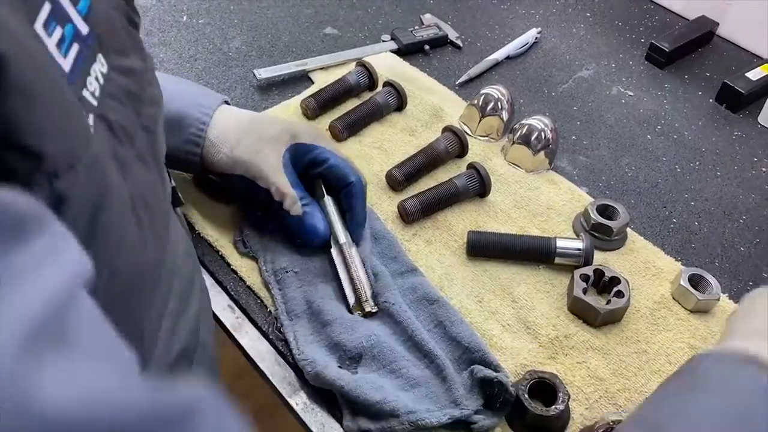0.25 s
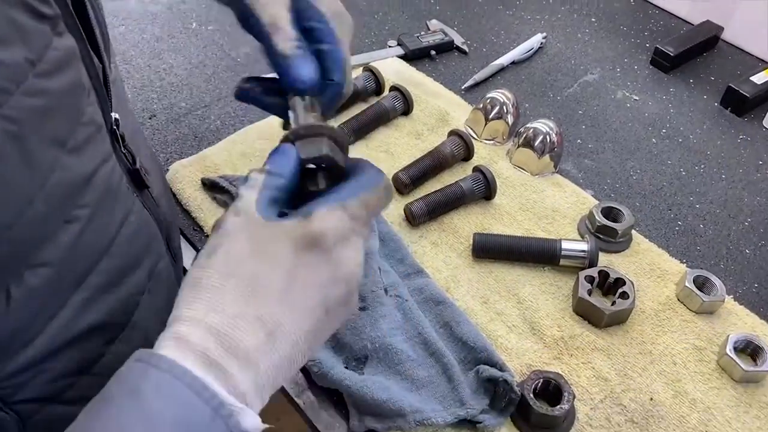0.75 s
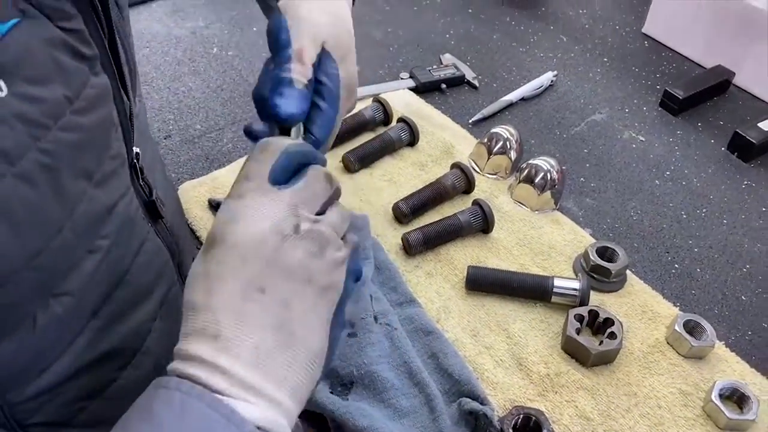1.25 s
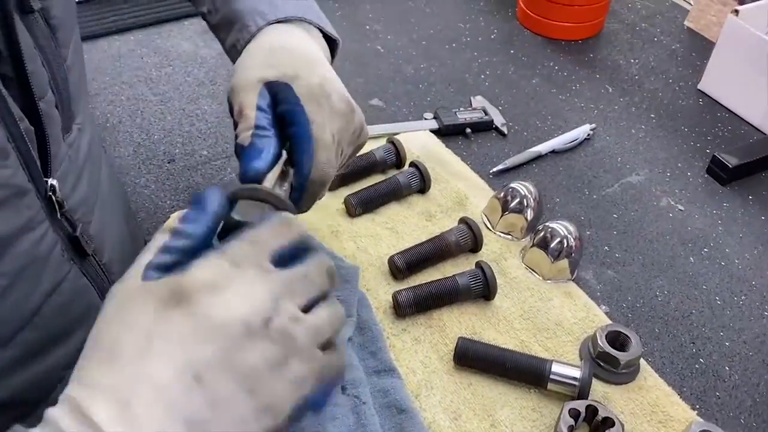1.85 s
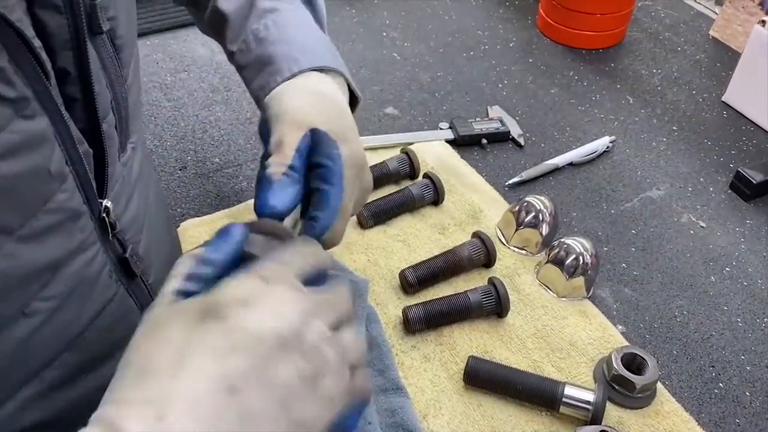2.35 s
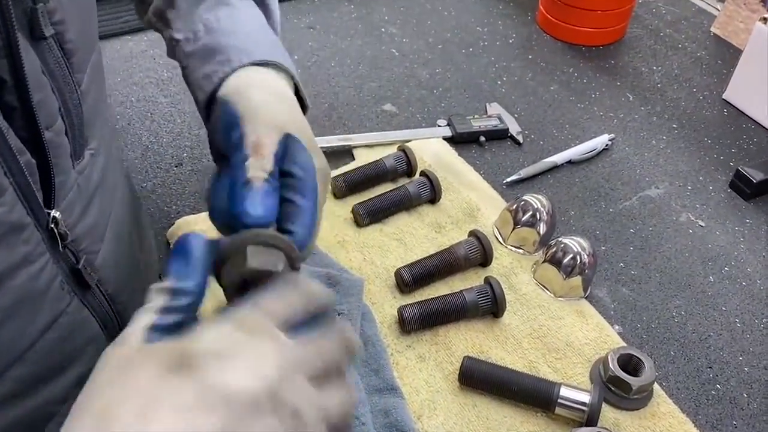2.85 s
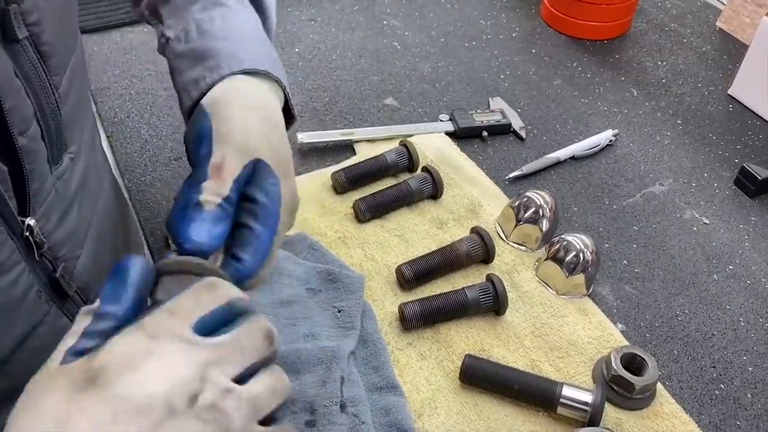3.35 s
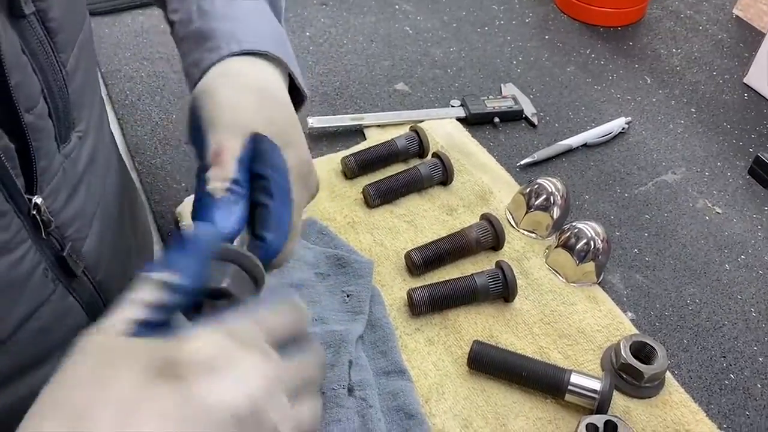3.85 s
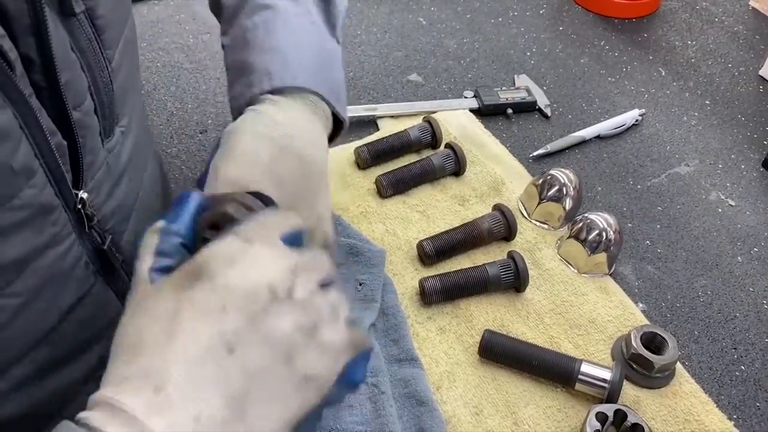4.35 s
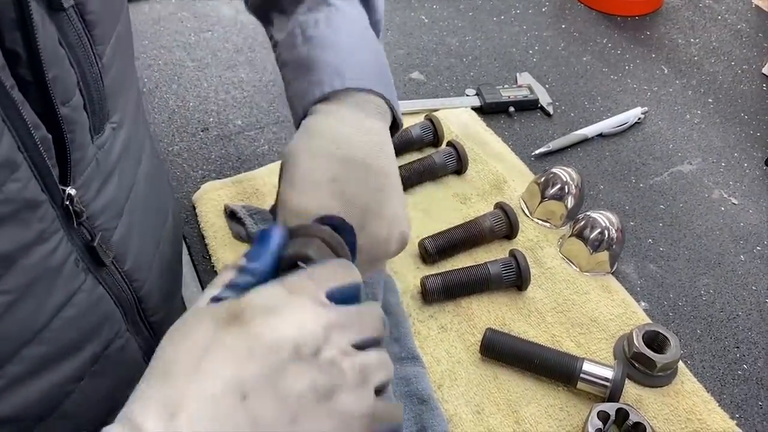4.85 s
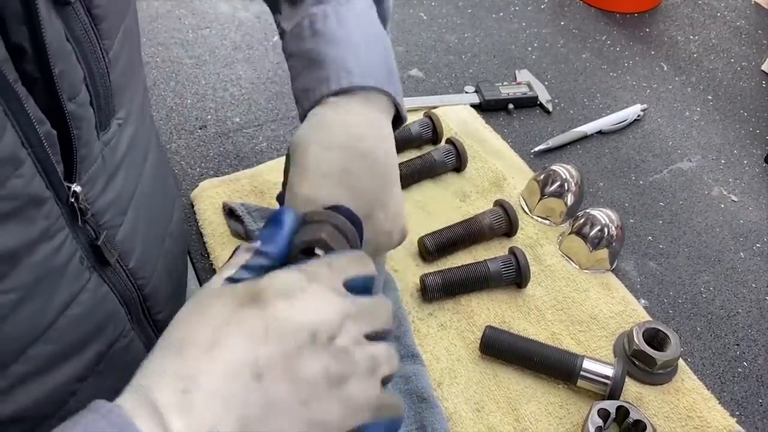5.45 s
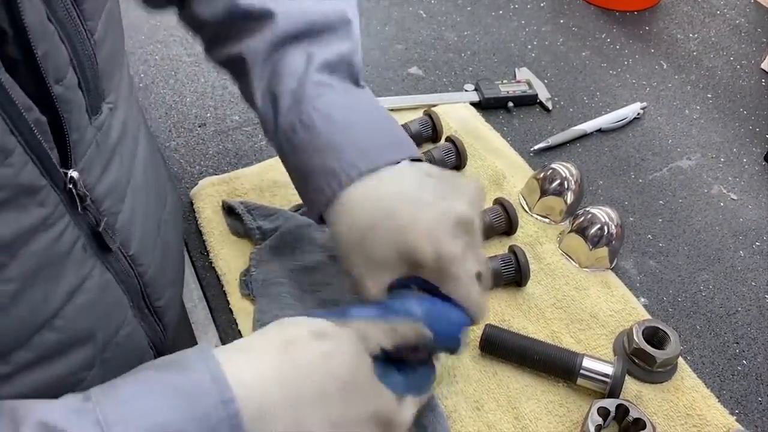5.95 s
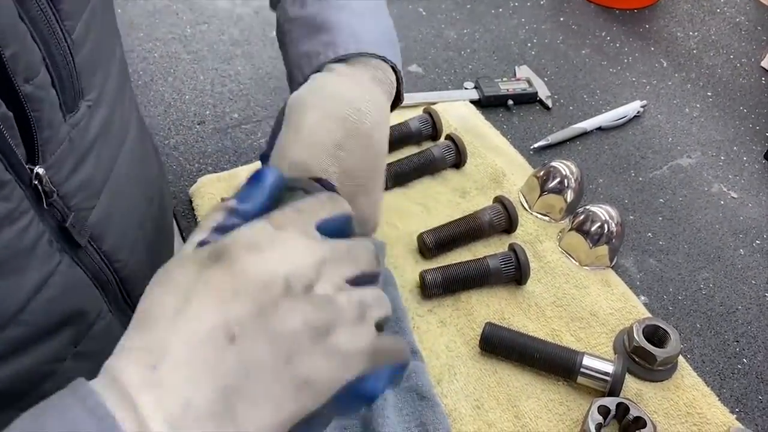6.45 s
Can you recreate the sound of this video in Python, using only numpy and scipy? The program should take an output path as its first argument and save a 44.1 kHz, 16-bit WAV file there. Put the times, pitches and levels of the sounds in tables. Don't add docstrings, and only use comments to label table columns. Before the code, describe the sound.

A close microphone in a shop with steady low ventilation rumble and soft hiss throughout. From 0 to 0.7 s there is only faint rubbery glove fizz, with a snap at 0.2 s. At 0.74 s a knuckle bumps the padded bench: a heavy, dull, quickly damped thud with small jolts after it. Soft glove slides follow. At 1.66 s a loud bright clink rings, repeated at 1.77 s as the nut meets the steel tap. Short twists then scrape and tick, with bright clacks near 2.7 s, gritty ticking from 3.1 to 3.6 s, strong clinks around 4.0 and 4.12 s, and another at 4.57 s. Faint high squeals appear. After about 5 s, metal sounds thin out and glove rubbing, snaps and regripping dominate, busiest from 5.7 to 6.6 s, with a brief chirp at 5.73 s. Short wall reflections trail the clinks.

```python
import sys
import numpy as np
from scipy import signal
from scipy.fft import rfft, irfft
from scipy.io import wavfile
from scipy.ndimage import uniform_filter1d, minimum_filter1d

SR = 44100
rng = np.random.default_rng(int(sys.argv[2]) if len(sys.argv) > 2 else 0)


def waveform_to_disk(signal):
    frames = np.transpose(np.atleast_2d(signal))
    scaled = np.clip(frames, -1, 1) * 32767
    samples = np.round(scaled).astype(np.int16)
    wavfile.write(sys.argv[1], SR, samples)


def boost_factor(decibels):
    exponent = np.asarray(decibels, float) / 20
    return 10 ** exponent


N = 295470


def evened(x):
    return x / np.sqrt(np.mean(x ** 2) + 1e-20)


def read(points, hz):
    f, value = np.transpose(points)
    return np.interp(np.log(hz + 1), np.log(f + 1), value)


def add(mix, s, sound):
    part = mix[round(s * SR):][:len(sound)]
    part += sound[:len(part)]


def coloured(x, spectrum):
    gain = boost_factor(read(spectrum, np.fft.rfftfreq(len(x), 1 / SR)))
    return irfft(rfft(x) * gain, len(x))


def bell(t, middle_s, half_s):
    return np.exp(-.5 * ((t - middle_s) / half_s) ** 2)


def resonate(x, hz, width):
    turn = np.exp(2j * np.pi * np.cumsum(hz * np.ones(len(x))) / SR)
    r = np.exp(-np.pi * width / SR)
    return 2 * (turn * signal.lfilter([1 - r], [1, -r], x / turn + 1e-18)).real


def resonate_twice(x, hz, width):
    return resonate(resonate(x, hz, width), hz, width)


def ringing(modes, t):
    return sum(boost_factor(db - 60 * t / t60) * np.sin(2 * np.pi * hz * t) for hz, db, t60 in modes)


def lumps(seconds, depth_db):
    size = max(round(seconds * SR), 1)
    wander = uniform_filter1d(uniform_filter1d(rng.standard_normal(N), size), size)
    return boost_factor(depth_db * evened(wander))


def slips(per_s, spread_db):
    size = boost_factor(spread_db * np.minimum(rng.exponential(1, N), 5)) * rng.choice([-1., 1.], N)
    return evened(size * (rng.random(N) < per_s / SR))


# pitch_hz, density_db (per Hz)
SHOP_AIR = [(15, -36), (25, -12), (50, -11.5), (72, 3), (96, 3.5), (156, -5.5), (233, -8), (297, -14),
            (421, -16), (703, -14), (970, -9.5), (1620, -19), (5140, -25), (15500, -30.5)]
# time_s, level_db
RUMBLE = [(0, -48.5), (.95, -47), (1.06, -49), (1.84, -47.5), (1.97, -50.5), (2.37, -49), (2.41, -46),
          (3.85, -45.5), (4.09, -52.5), (4.18, -46.5), (4.3, -48.5), (6.7, -48)]


def shop():
    air = boost_factor(-45.0) * evened(coloured(rng.standard_normal(N), SHOP_AIR))
    bass = signal.sosfiltfilt(signal.butter(2, 220, fs=SR, output="sos"), air)
    s, db = np.transpose(RUMBLE)
    swell = boost_factor(np.interp(np.arange(N) / SR, s, db))
    return air - bass + swell * evened(bass)


# time_s, level_db
FIDGET = [(0, -74), (.2, -58.5), (.45, -55), (.72, -52.5), (.76, -67), (1.0, -73), (1.1, -55.5), (1.6, -62),
          (1.9, -70), (2.1, -53), (2.65, -58), (2.85, -55), (3.6, -64), (3.8, -68), (4.3, -57),
          (5.0, -58.5), (5.5, -54.5), (6.7, -54.5)]


def pressure(moves, rest_db, lag_s=0.0021):
    t = np.arange(N) / SR
    level_db = np.interp(t, *np.transpose(FIDGET)) + rest_db
    for s, length, db, swell_db in moves:
        part = level_db[round(s * SR):round((s + length) * SR)]
        np.maximum(part, db + swell_db * np.linspace(-.5, .5, len(part)), out=part)
    keep = np.exp(-1 / (lag_s * SR))
    return signal.lfilter([1 - keep], [1, -keep], boost_factor(level_db))


# start_s, length_s, level_db, swell_db
SLIDES = [(0.408, 0.021, -49, -3), (0.736, 0.021, -47, -24), (0.836, 0.12, -54.5, -5),
          (1.028, 0.03, -53, -1), (1.222, 0.047, -48, -14), (2.108, 0.035, -50.5, 0),
          (2.284, 0.064, -48.5, 9), (2.346, 0.072, -44, -9), (2.692, 0.056, -48, 0),
          (2.942, 0.058, -43, -1), (3.879, 0.059, -48, 0), (4.116, 0.084, -46, -13),
          (4.368, 0.026, -47.5, -6), (4.4, 0.19, -54.5, -2), (4.56, 0.058, -45.5, -10),
          (4.795, 0.13, -50.5, 10), (5.076, 0.17, -50.5, -4), (5.364, 0.079, -50.5, 11),
          (5.456, 0.029, -44, -1), (5.654, 0.043, -49.5, 9), (5.722, 0.029, -39, 0),
          (5.754, 0.029, -39.5, 4), (5.843, 0.015, -45, -2), (5.868, 0.049, -50.5, -2),
          (5.961, 0.039, -50, -21), (6.015, 0.044, -42.5, 4), (6.064, 0.03, -43, -1),
          (6.097, 0.083, -49, 9), (6.284, 0.036, -42.5, -8), (6.359, 0.025, -40.5, 5),
          (6.387, 0.033, -43.5, -5), (6.423, 0.028, -43, -5), (6.514, 0.042, -43.5, 11),
          (6.614, 0.034, -52.5, -26), (5.801, 0.015, -50, -3), (6.46, 0.021, -54, -8), (6.18, .08, -56, -3)]
# start_s, length_s, grit_db, tap_ring_db, swell_db
TWISTS = [(1.669, 0.12, -46.5, -44, 9), (1.79, 0.086, -52, -40, -8), (1.977, 0.036, -54, -46, 4),
          (2.22, 0.12, -50, -50.5, 8), (2.473, 0.11, -41, -44, 1), (2.931, 0.056, -44.5, -59, 7),
          (3.172, 0.054, -39.5, -48, 4), (3.229, 0.041, -38, -40, 6), (3.275, 0.098, -39.5, -44, 2),
          (3.383, 0.11, -56, -49, 0), (3.89, 0.071, -51.5, -49, -5), (4.026, 0.072, -65, -50, -10),
          (4.157, 0.11, -45.5, -41.5, -6), (4.598, 0.093, -53.5, -46.5, -25),
          (4.816, 0.094, -47, -46.5, -6), (5.091, 0.086, -47.5, -52, 2)]
# start_s, length_s, grit_db, tap_ring_db
BITES = [(1.775, .019, -41, -34), (2.011, .016, -42, -39), (2.046, .018, -50, -41), (2.669, .037, -45, -60),
         (2.706, .016, -29.5, -32), (2.722, .038, -48, -51), (3.433, .022, -39.5, -43),
         (3.592, .031, -41, -40), (3.854, .022, -43.5, -47), (3.967, .014, -29.5, -44),
         (3.989, .006, -29.5, -22), (4.0, .024, -32, -34), (4.09, .025, -43, -45),
         (4.122, .038, -35.5, -34.5), (4.556, .019, -38.5, -40), (4.575, .005, -34, -35.5),
         (4.584, .013, -33, -36), (5.768, .022, -45, -58), (2.029, .014, -38, -38), (2.064, .009, -37, -42),
         (2.553, .012, -42, -45)]
BITE_SWELL_DB = -7
DRAG_GRIT_DB, DRAG_RING_DB, RUB_DB = -7.5, -32, -15
FIDGET_RING_DB, FIDGET_GLOVE_DB = -21, -6


def movements():
    turns = TWISTS + [(*row, BITE_SWELL_DB) for row in BITES]
    s, length, grit_db, ring_db, swell_db = np.transpose(turns)

    def steel(db):
        return list(zip(s, length, db, swell_db))

    def drag(more_db):
        return [(start, long, db + more_db, swell) for start, long, db, swell in SLIDES]

    grind = pressure(steel(grit_db) + drag(DRAG_GRIT_DB), 0)
    ring = pressure(steel(ring_db) + drag(DRAG_RING_DB), FIDGET_RING_DB)
    slide = pressure(steel(grit_db + RUB_DB) + SLIDES, FIDGET_GLOVE_DB, lag_s=0.0048)
    return grind, ring, slide


# pitch_hz, density_db (per Hz)
GLOVE = [(900, -27), (1900, -17), (2700, -8), (4600, 1), (6300, -2.5), (8200, -2.5), (10600, -7.5),
         (12000, -14.5), (16000, -22)]
# time_s, peak_db, centre_hz
SNAPS = [(0.198, -23, 5040), (0.3476, -45, 5640), (1.226, -37, 5920), (2.2598, -34, 6060),
         (2.4453, -34, 4280), (2.9691, -23, 5840), (3.059, -32, 4500), (3.1175, -30.5, 6300),
         (4.4657, -34, 4600), (4.5015, -26.5, 6340), (4.78, -28, 5930), (5.079, -30, 6300),
         (5.0973, -31, 6440), (5.362, -31, 4930), (5.385, -31.5, 6030), (5.656, -28, 5800),
         (5.677, -25.5, 4560), (4.8606, -33, 6480), (5.8461, -40, 4600), (6.0229, -33, 4980),
         (6.082, -26, 7200), (6.2868, -34, 7620), (6.2933, -32, 5070), (6.369, -31, 4450),
         (6.5467, -30, 7060), (6.6181, -38, 4430), (5.962, -25, 6900), (5.981, -25.5, 4800),
         (6.6617, -31, 6060)]


def gloves(slide):
    fizz = coloured(slips(6000, 2.9) + rng.standard_normal(N), GLOVE)
    z = signal.stft(fizz, nperseg=256)[2]
    patches = uniform_filter1d(rng.standard_normal(z.shape), 5, 0)
    patches = evened(uniform_filter1d(patches, 9, 1))
    fizz = signal.istft(z * boost_factor(2.3 * patches), nperseg=256)[1][:N]
    out = boost_factor(1.0) * evened(fizz * lumps(0.004, 1.3)) * slide
    t = np.arange(round(0.021 * SR)) / SR
    for (s, db, hz), noise in zip(SNAPS, rng.standard_normal((len(SNAPS), len(t)))):
        pop = 0.95 * np.sin(2 * np.pi * hz * t) * bell(t, .0009, .00017)
        fray = evened(resonate_twice(noise, hz, 5700)) * boost_factor(-60 * t / 0.028)
        fray = fray * np.minimum(t / 0.0011, 1)
        add(out, s, boost_factor(db) * (pop + 0.36 * fray))
    return out


# time_s, peak_db, widest_s (time to the widest swing)
KNOCK = (.7385, -2.9, 0.00936)
# pitch_hz, level_db, t60_s
BENCH = [(123.3, 2.5, 0.068), (220, -14.5, 0.21), (323, -26, 0.37), (119.4, -20, 0.4), (70, -25, .26)]
PALM_S, PALM_DB = .0275, -12.0


def knock():
    out, t = np.zeros(N), np.arange(round(.4 * SR)) / SR
    s, db, widest = KNOCK
    push = np.sin(np.pi / 2 * np.clip(t / widest, 0, 1))
    stiff = t - widest - 0.0049 * (np.exp(-t / 0.0047) - np.exp(-widest / 0.0053))
    since = np.maximum(t - widest, 0)
    swing = sum(boost_factor(d - 60 * since / t60) * np.cos(2 * np.pi * f * stiff) for f, d, t60 in BENCH)
    swing = swing * boost_factor(PALM_DB * np.clip((t - PALM_S) / 0.0044, 0, 1))
    noise = rng.standard_normal((2, len(t)))
    tick = boost_factor(-25.0) * evened(resonate_twice(noise[0], 930, 910)) * boost_factor(-60 * t / 0.064)
    tick_modes = [(845, -22, 0.017), (1200, -25, 0.067), (653, -26.0, 0.058), (2250, -28.0, 0.035)]
    tick = tick + ringing(tick_modes, t)
    shudder = evened(resonate(resonate(noise[1], 190, 230), 180, 180))
    shudder = boost_factor(-26.5) * shudder * boost_factor(-60 * t / 0.21) * push
    add(out, s, boost_factor(db) * (0.5 * swing * push + tick + shudder))
    return out


# time_s, peak_db, pitch_hz
JOLTS = [(0.7546, -25, 270), (0.7614, -21, 190), (1.766, -35, 610), (.791, -24, 190), (.812, -25, 200),
         (1.504, -34, 150), (1.663, -38, 600), (3.27, -42, 660), (3.284, -36, 646), (3.433, -34.5, 790),
         (3.995, -33, 473), (5.962, -35, 600), (4.575, -42, 710), (3.262, -45, 696), (3.336, -41, 730),
         (3.364, -38, 800)]


def jolts():
    out, t = np.zeros(N), np.arange(round(.4 * SR)) / SR
    for s, db, hz in JOLTS:
        add(out, s, boost_factor(db) * ringing([(hz, -2, .04), (1.67 * hz, -13, .025)], t))
    return out


# middle_s, half_length_s, level_db
SWISHES = [
    (1.237, 0.0092, -49),
    (2.358, 0.024, -43.5),
    (2.97, .018, -50),
]


def swishes():
    t = np.arange(N) / SR
    flick = sum(boost_factor(db) * bell(t, s, length) for s, length, db in SWISHES)
    return flick * evened(resonate_twice(rng.standard_normal(N), 10700, 5000))


# time_s, peak_db, contact_hz, tap_ring_db, tap_ring_hz
CLINKS = [(1.6624, 1.5, 3840, -3, 5840), (1.6632, -1.5, 4300, -40, 5900), (1.6643, -6.5, 3480, -40, 5900),
          (1.7657, -7, 5470, 2, 5850), (1.7676, -11, 4620, -40, 5900), (2.4747, -17, 4100, -40, 5860),
          (2.668, -14.5, 3100, -17, 6140), (2.7192, -5.5, 4050, -14, 6160), (2.7235, -12, 2960, -22, 6400),
          (3.3348, -13.5, 2600, -14, 5820), (3.3631, -11.5, 3600, -34, 5760),
          (3.856, -17.5, 2190, -8.5, 5900), (3.9685, -10.5, 3850, -16, 5870),
          (3.9744, -4.5, 3840, -19, 5900), (3.9942, -2, 3750, -10, 5820), (4.1223, -3.5, 4560, -7, 5920),
          (4.15, -19, 3600, -13, 6140), (4.574, -6, 3760, -11.5, 5860), (4.586, -21, 2720, -6, 5900)]
# time_s, peak_db, contact_hz
TICKS = [(1.7764, -12, 3520), (1.7794, -14, 2670), (1.7819, -10.5, 3080), (1.7844, -19, 3650),
         (1.8342, -22.5, 3340), (1.982, -29, 2110), (2.496, -17, 2800), (2.572, -21, 3020),
         (2.6774, -24, 2930), (3.094, -21.5, 2360), (3.1758, -22, 2140), (3.1818, -23, 3560),
         (3.1964, -21, 2740), (3.2115, -20, 3580), (3.249, -17.5, 2250), (3.2979, -14, 2450),
         (3.326, -18.5, 2090), (3.3462, -24, 2820), (3.4377, -13.5, 3530), (3.475, -23, 2760),
         (3.592, -29, 2600), (3.6093, -10.5, 3380), (4.004, -24, 3600), (4.012, -24, 2820),
         (4.498, -16, 3120), (4.804, -21.5, 3140), (4.9024, -21, 3670), (5.0972, -20.5, 2100),
         (3.3085, -21, 2470), (3.2599, -17, 2070), (3.231, -20, 2600), (2.512, -27, 3000),
         (2.547, -23, 3580), (4.003, -28, 2000)]
TICK_RING_DB, TICK_RING_HZ, TICK_RING_SPREAD = -19.5, 5920, 0.011
# delay_s, level_db
ECHOES = [(.0022, -6), (.0042, -13)]
# pitch_hz, width_hz, level_db
HELD = [(1740, 37, -6.5), (2120, 84, 4.5), (2750, 380, -5), (3280, 85, 5), (3750, 190, -1.5),
        (4560, 61, 4.5), (5180, 104, -1)]
# pitch_factor (on the ring pitch), level_db, t60_s
TAP = [(.957, -6, 0.021), (1.002, 1, 0.022), (1.006, -13, 0.043), (1.021, -27, 0.038), (1.001, -45, .3),
       (1.01, -36, .18), (1.019, -38, .28)]
HISS_DB, HISS_PER_DB, HISS_PER_RING = -32, 4, .1


def clinks():
    out, t = np.zeros(N), np.arange(round(.14 * SR)) / SR
    ring_hz = TICK_RING_HZ * (1 + TICK_RING_SPREAD * rng.standard_normal(len(TICKS)))
    rows = CLINKS + [(*row, TICK_RING_DB, hz) for row, hz in zip(TICKS, ring_hz)]
    bounces = np.zeros(round(.01 * SR))
    bounces[0] = 1
    for delay, echo_db in ECHOES:
        bounces[round(delay * SR)] = boost_factor(echo_db)
    edge = boost_factor(-14) * np.sin(2 * np.pi * 10500 * t) * bell(t, .0005, .00005)
    for (s, db, hz, tap_db, tap_hz), noise in zip(rows, rng.standard_normal((len(rows), len(t)))):
        pulse = np.sin(2 * np.pi * hz * t) * bell(t, .0006, .00016) + edge
        buzz = 0.33 * evened(resonate_twice(noise, hz, 1900))
        buzz = buzz + 0.034 * evened(resonate(noise, 940, 600))
        weights = np.tanh(noise[-len(HELD):])
        held = sum(w * ringing([(f, d - 20.0, 1.16 / width)], t) for w, (f, width, d) in zip(weights, HELD))
        held = held + ringing([(hz, -11.5, .02)], t)
        hiss_db = HISS_DB + HISS_PER_DB * db + HISS_PER_RING * tap_db
        hiss = boost_factor(hiss_db) * evened(resonate(resonate(noise, 7000, 6000), 9200, 6000))
        tap = boost_factor(tap_db + 4.5) * ringing([(f * tap_hz, d, t60) for f, d, t60 in TAP], t)
        sharp = np.clip(1 - boost_factor(tap_db + 3.5), .25, 1)
        add(out, s, boost_factor(db) * 1.14 * sharp * np.convolve(pulse[:200], bounces))
        rattle = (buzz + hiss) * boost_factor(-60 * t / 0.029) + held + tap
        add(out, s + 0.00019, boost_factor(db) * rattle * np.minimum(t / 0.0002, 1))
    return out


# time_s, peak_db, pitch_hz
FAVOURED = [(1.6632, -15, 3330), (1.6652, -21.5, 2750), (1.6636, -36, 2100), (1.6628, -24, 6800),
            (1.663, -33, 8400), (1.7659, -31, 6900), (1.766, -31, 8400), (1.766, -33, 9200),
            (1.766, -36, 10500), (2.031, -26, 2520), (2.4749, -22, 4190), (2.475, -27.5, 2510),
            (2.5562, -29, 2820), (2.6682, -23.5, 3330), (2.6776, -29, 2930), (2.7201, -14.5, 3080),
            (3.2101, -32, 3150), (3.2605, -29, 2930), (3.309, -28, 1690), (3.335, -27, 4900),
            (3.346, -28, 1760), (3.3634, -26, 2140), (3.8562, -34, 2200), (3.8562, -26, 3680),
            (3.968, -27, 2120), (3.9687, -23, 4590), (3.9902, -19, 2720), (3.9944, -28, 3280),
            (4.012, -25, 2800), (4.1228, -19.5, 2710), (4.1226, -17, 3280), (4.1226, -7.5, 4560),
            (4.166, -28, 3080), (4.575, -23, 2700), (4.586, -24, 3060), (4.586, -23, 4580)]


def favoured_modes():
    out, t = np.zeros(N), np.arange(round(.04 * SR)) / SR
    for s, db, hz in FAVOURED:
        add(out, s, ringing([(hz, db, .021)], t) * np.minimum(t / 0.0006, 1))
    return out


# time_s, main_db, top_db, low_db, low_hz
NUT_RINGS = [(1.6641, -35, -42, -41, 7800), (1.777, -38, -58, -70, 7740), (1.8228, -45, -67, -66, 7650),
             (2.0383, -41, -61, -70, 8400), (2.0695, -65, -70, -46, 7840), (2.4755, -35, -64, -41, 7100),
             (2.6693, -51, -66, -62, 7630), (2.717, -43, -58, -39, 8000), (3.263, -41, -66, -55, 8080),
             (3.4396, -44, -65, -60, 8000), (3.9674, -52, -56, -53, 7600), (4.0075, -39, -46, -48, 7740),
             (4.1227, -27.5, -41, -45, 8450)]
NUT_HZ = 11490, 14460
NUT_T60_S = 0.034


def nut():
    out, t = np.zeros(N), np.arange(round(.2 * SR)) / SR
    main_hz, top_hz = NUT_HZ
    for s, db, top_db, low_db, low_hz in NUT_RINGS:
        t60 = NUT_T60_S * boost_factor(.45 * max(db + 43, 0))
        modes = [(main_hz, db, t60), (top_hz, top_db, t60),
                 (low_hz, low_db + 7, NUT_T60_S), (10640, db - 10, .6 * t60)]
        add(out, s, ringing(modes, t) * np.minimum(t / 0.00098, 1))
    return out


# pitch_hz, density_db (per Hz)
GRIT = [(500, -4.5), (1300, 1), (2500, 1), (5000, -0.5), (7000, 0.5), (9000, -72), (16000, -42)]
# time_s, pitch_hz
TAP_HZ = [(0, 5930), (1.98, 5910), (2.05, 6160), (2.3, 6090), (2.5, 5980), (2.55, 6300), (2.7, 6090),
          (3.17, 6250), (3.27, 6450), (3.31, 5880), (4.12, 5950), (4.17, 6130), (4.3, 6040), (4.55, 5890),
          (4.78, 5900), (4.86, 6300), (6.7, 5900)]


def thread(grind, ring):
    drive = evened((slips(2000, 2.8) + .6 * rng.standard_normal(N)) * lumps(.003, 1.8))
    scrape = coloured(drive, GRIT)
    grit = .5 * scrape
    for k, (mode_hz, width, db) in enumerate(HELD):
        grit = grit + (-1) ** k * boost_factor(db) * resonate(scrape, mode_hz, width)
    hz = np.interp(np.arange(N) / SR, *np.transpose(TAP_HZ))
    near = resonate(np.tanh(drive / 2), hz, 900)
    rub = near * ring / np.std(resonate(near, hz, 50))
    pair = resonate(rub, hz, 50) + .7 * resonate(rub, 1.012 * hz, 50) + .2 * resonate(rub, .95 * hz, 200)
    tight = np.clip(grind / boost_factor(-39), 0, 1)
    pair = (1 - tight) * pair + tight * .7 * resonate(rub, hz, 380)
    return evened(grit) * grind + boost_factor(-8.0) * pair


# middle_s, peak_db, ring_hz, half_length_s
GRAZES = [(2.022, -27, 5950, .0022), (2.0415, -24.5, 6260, .0028), (2.07, -32, 6180, .0029),
          (2.559, -31, 6100, .0024), (2.71, -23, 5900, .003), (3.2615, -25, 6450, .0014),
          (3.9962, -9, 5900, .0014), (4.003, -22, 6000, .002), (4.0155, -22, 5850, .0025),
          (4.156, -30, 6150, .003), (3.448, -37, 6200, .0028), (4.333, -41, 8000, .002),
          (4.521, -38, 6200, .0025), (1.7683, -5.5, 5930, .001), (1.7722, -15, 5950, .0017),
          (1.67, -14, 5950, .0013), (1.6777, -24, 6000, .0008)]


def grazes():
    out, t = np.zeros(N), np.arange(round(.04 * SR)) / SR
    middle = t[-1] / 2
    for s, db, hz, length in GRAZES:
        add(out, s - middle, boost_factor(db) * np.sin(2 * np.pi * hz * t) * bell(t, middle, length))
    return out


# time_s, pitch_hz, level_db
SQUEAK = [
    [(2.475, 8100, -58), (2.497, 8388, -58), (2.519, 8389, -55), (2.545, 8008, -63)],
    [(5.565, 4159, -63), (5.573, 4090, -59), (5.587, 4203, -54), (5.605, 4178, -55)],
    [(5.732, 7250, -40), (5.737, 7280, -33), (5.742, 7400, -48)],
    [(2.016, 10650, -60), (2.034, 10650, -54), (2.05, 10620, -56)],
    [(1.773, 9170, -52), (1.785, 9170, -55), (1.797, 9170, -60)],
    [(1.771, 7810, -43), (1.79, 7810, -47), (1.806, 7800, -57)],
]


def squeak():
    out = np.zeros(N)
    for s, hz, db in map(np.transpose, SQUEAK):
        t = np.arange(s[0], s[-1], 1 / SR)
        phase = 2 * np.pi * np.cumsum(np.interp(t, s, hz)) / SR
        tone = np.sin(phase) * signal.windows.tukey(len(t), .2)
        add(out, s[0], np.sqrt(2) * boost_factor(np.interp(t, s, db)) * tone)
    return out


# pitch_hz, t60_s
WALLS = [(300, 0.4), (2600, 0.38), (6000, 0.35), (14000, 0.29)]


def room(x, wet_db):
    taps = np.zeros(SR // 2)
    at = np.arange(300, len(taps) - 20, 20)
    taps[at + rng.integers(0, 20, len(at))] = rng.choice([-1., 1.], len(at))
    hz, t, z = signal.stft(taps, SR, nperseg=256)
    tail = signal.istft(z * boost_factor(-60 * t / read(WALLS, hz)[:, None]), SR, nperseg=256)[1]
    tail = boost_factor(wet_db) * tail / np.linalg.norm(tail)
    tail[0] += 1
    return signal.fftconvolve(x, tail)[:N]


def scene():
    grind, ring, slide = movements()
    hands = gloves(slide) + swishes() + knock() + jolts()
    steel = boost_factor(-7.0) * clinks() + favoured_modes() + nut() + thread(grind, ring) + grazes() + squeak()
    return (room(hands + steel, wet_db=-15.5) + shop())[None]


def top_cut(x):
    return signal.sosfilt(signal.butter(12, 16510, fs=SR, output="sos"), x)


def record(dry):
    edge = signal.firwin(401, 15770, window=("kaiser", 8), fs=SR)[None]
    x = signal.oaconvolve(dry, edge, "same")
    headroom = minimum_filter1d(1 / np.maximum(abs(x), 1), size=81)
    return top_cut(x * uniform_filter1d(headroom, size=41))


dry = scene()
out = record(dry)
waveform_to_disk(out)
```